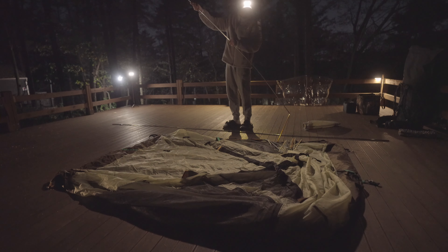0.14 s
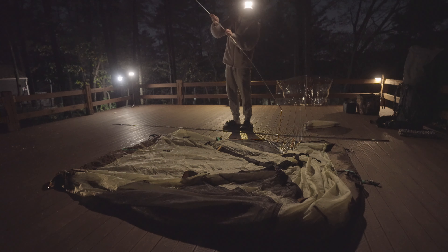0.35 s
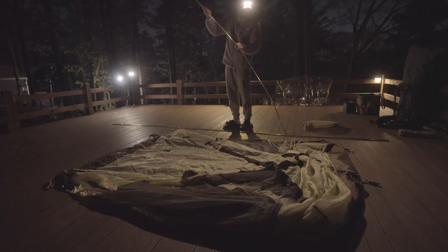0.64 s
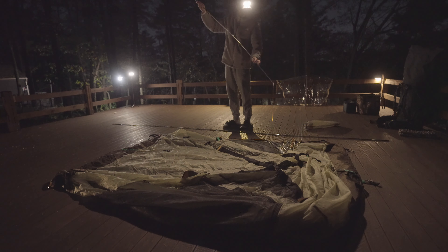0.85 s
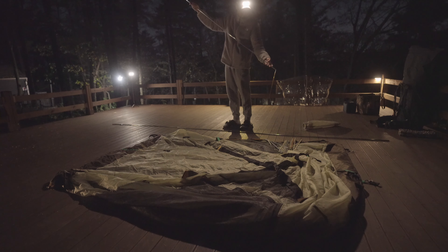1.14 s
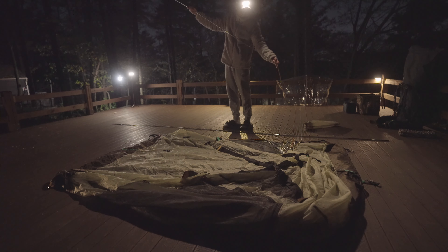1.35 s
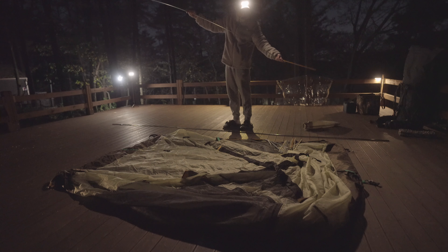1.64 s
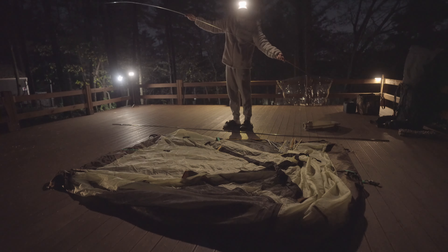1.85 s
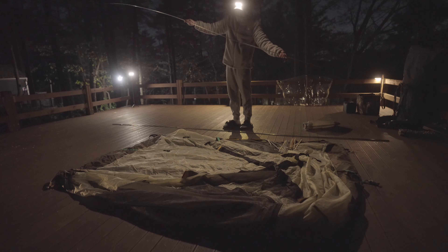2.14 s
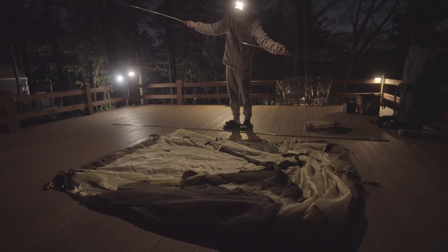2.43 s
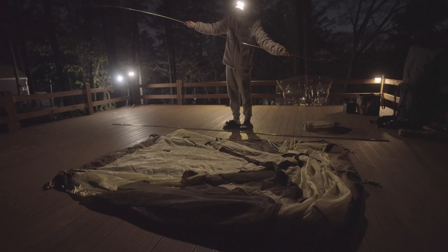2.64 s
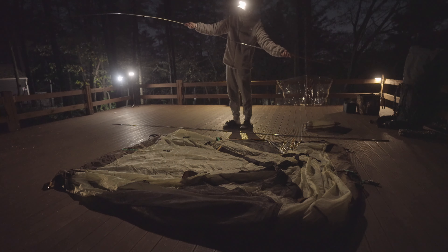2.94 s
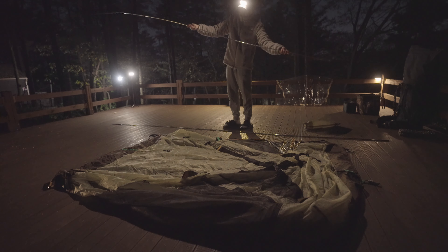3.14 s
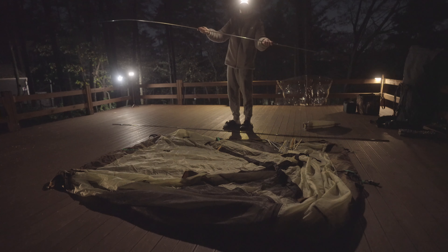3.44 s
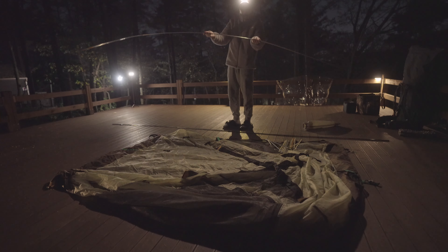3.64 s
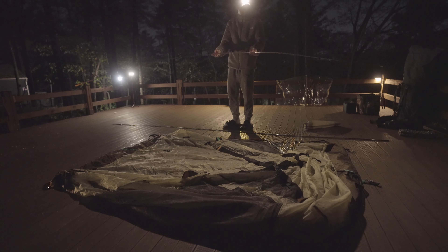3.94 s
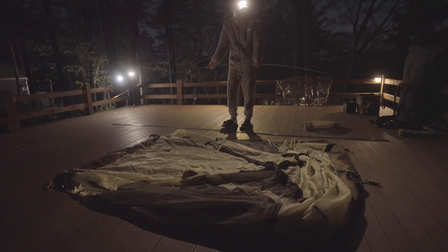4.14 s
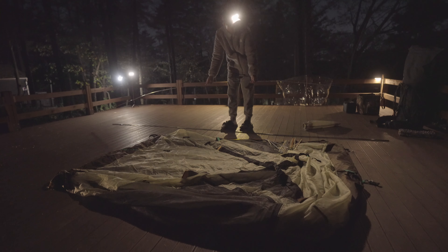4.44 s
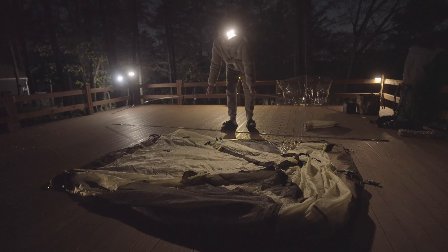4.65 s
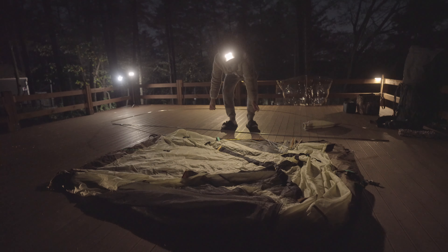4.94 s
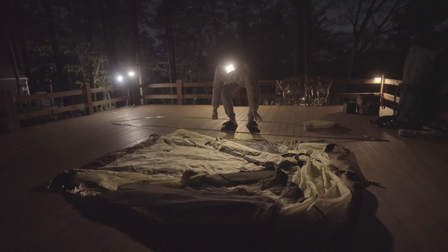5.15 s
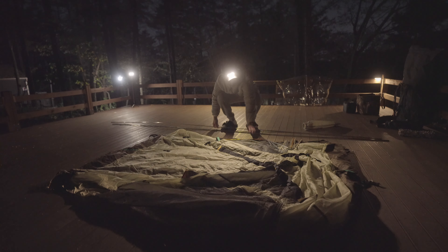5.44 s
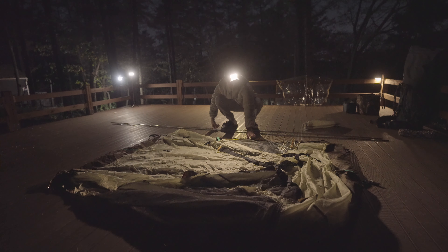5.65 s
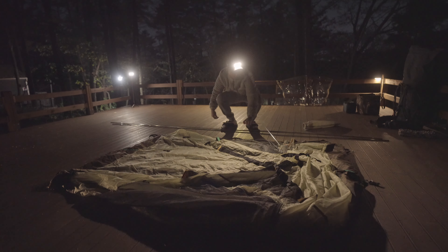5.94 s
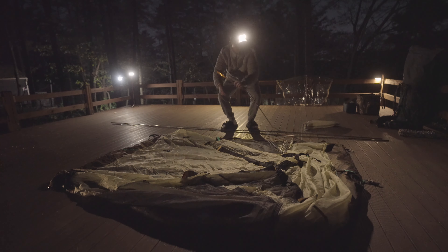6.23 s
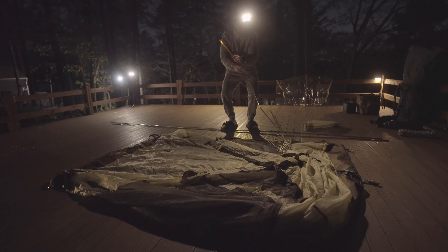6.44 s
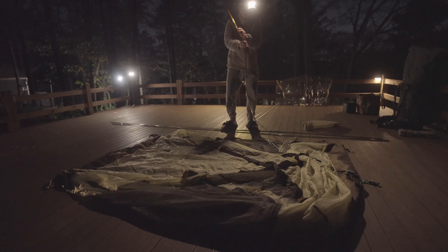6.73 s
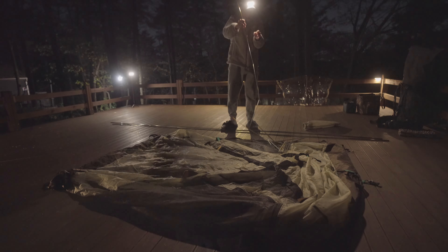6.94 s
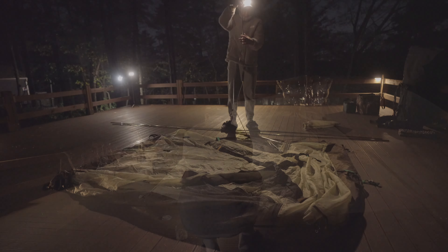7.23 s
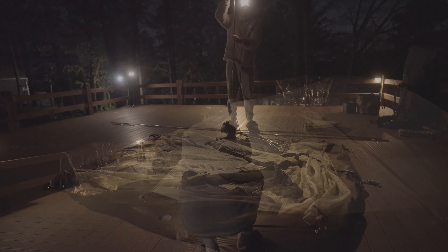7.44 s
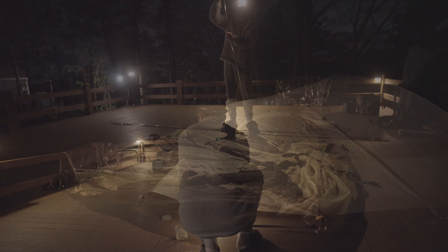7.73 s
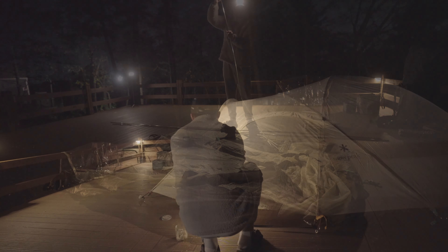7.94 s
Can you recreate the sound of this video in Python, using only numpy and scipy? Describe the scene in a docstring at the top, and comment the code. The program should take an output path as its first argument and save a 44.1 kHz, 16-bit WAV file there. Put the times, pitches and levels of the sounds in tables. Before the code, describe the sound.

Metal tent pole joints snap together and a pole clatters on a wooden deck, with nylon rustling in quiet outdoor air.

```python
"""A sharp metal snap comes first: elastic cord pulls the joint of a tent pole home, on a wooden deck at night.
More joints snap; a pole is laid down and clatters, each impact exciting the modes of tube and boards.
A tip drags by stick-slip friction, soft steps thump, nylon rustles and ticks, and a pole zips along it.
Trees scatter a faint echo, and behind the steady night air a far engine climbs in pitch."""
import sys
import numpy as np
from scipy import signal
from scipy.fft import rfft, irfft, next_fast_len
from scipy.io import wavfile
from scipy.ndimage import map_coordinates

SR = 44100
rng = np.random.default_rng(int(sys.argv[2]) if len(sys.argv) > 2 else 0)


def to_wav(s):
    """Save 16-bit WAV."""
    ch = np.atleast_2d(s).T  # columns
    pcm = np.round(np.clip(ch, -1, 1) * 32767)  # PCM
    wavfile.write(sys.argv[1], SR, pcm.astype(np.int16))


N = 355887
TIME = np.arange(N) / SR
HIT_TIME = np.arange(SR * 3 // 4) / SR  # seconds since one contact


# ferrule and tube spectra: (frequency [Hz], level [dB])
FERRULE_SPECTRUM = [(1500, -38), (4000, -14), (6000, -4), (8300, -0.5), (11000, -4.5), (13000, -4),
                    (16000, -3)]
TUBE_SPECTRUM = [(300, -31), (1000, -16), (2000, -4), (2800, 0), (4200, -0.5), (6000, -9), (10000, -34.5)]
# where the hands work: (time [s], leftward pan [dB])
HAND_PATH = [(0, -2.5), (2.4, -4.5), (5.8, -10), (7.0, -6.5), (7.15, -5)]
# joint snaps and small ticks of the rustling cloth (6.011 and 6.763 s): (time [s], level [dB],
# relative tube level [dB], clink frequency [Hz], ring frequency [Hz], relative rattle level [dB])
SNAPS_AND_TICKS = [(0.0309, -11, -12, 2740, 8500, -10), (0.049, -25, -14, 2720, 8750, 0),
                   (0.547, -43, -9, 2600, 8400, -10), (0.652, -52, -14, 3500, 7500, -8),
                   (1.3107, -42, -7.5, 3800, 8440, -0.5), (1.3961, -34, -10, 2800, 14800, -7.5),
                   (2.363, -19.5, -11.5, 3620, 6970, -18), (4.581, -57, 4.5, 2900, 5500, -10),
                   (5.8092, -43, -18, 4090, 8100, -18), (6.011, -37, -8.5, 2900, 7500, -11),
                   (6.111, -33.5, -19, 3060, 10540, -5.5), (6.373, -30.5, -15, 3740, 7200, -2.5),
                   (6.4429, -20.5, -15.5, 2960, 13900, -3.5), (6.5048, -25.5, -11, 4110, 10500, -2.5),
                   (6.7469, -15.5, -40, 4270, 12400, -5), (6.763, -23.5, -25, 4270, 8850, -6),
                   (6.9033, -15, -14.5, 3440, 15450, -0.5), (7.0406, -24, -15, 4000, 11900, -7),
                   (7.0728, -20, -11, 3400, 12750, -4), (7.153, -22, -10.5, 2920, 8400, -16),
                   (7.7347, -39, -20, 3870, 6630, -10), (7.8009, -23.5, -11.5, 3620, 7140, -17),
                   (7.896, -20, -17.5, 4200, 10300, -11.5)]
def snaps_and_ticks():
    """Impact excitation: the cord pulls a ferrule home, the tube rings and loose contacts buzz.
    Small ticks of the rustling cloth share the same short, bright sound."""
    track = np.zeros((2, N))
    strike = fade(t60=0.019, attack=0.0002)
    for time, db, tube_db, clink_hz, ring_hz, rattle_db in SNAPS_AND_TICKS:
        snap = mode_noise(FERRULE_SPECTRUM, ripple_db=3.5, groups=80)
        ferrule = snap + amp(-7) * mode_cluster(ring_hz, width_hz=310)
        clack = mode_noise(TUBE_SPECTRUM, ripple_db=3.5)
        tube = amp(tube_db - 2.5) * (clack + amp(-2) * mode_cluster(clink_hz, width_hz=260))
        rattle = amp(rattle_db) * chatter(rate=284, depth_db=1) * fade(t60=0.087, attack=0.0077)
        click = ferrule * (strike + rattle) + tube * (fade(t60=0.053, attack=0.00027) + rattle)
        pan_db = np.interp(time, *np.transpose(HAND_PATH))
        add(track, time, panned(amp(db + 2) * click, pan_db))
    return track


# struck metal and hollow deck spectra: (frequency [Hz], level [dB])
CRACK_SPECTRUM = [(800, -24), (1800, -1), (3200, 0), (5000, -4), (7000, -2), (10000, -10.5), (16000, -12)]
THUMP_SPECTRUM = [(40, -19), (100, -7), (150, -5), (230, -3), (350, -0.5), (520, -4.5), (900, -7.5),
                  (2500, -97)]
# pole hitting the deck: (time [s], level [dB], relative crack level [dB], leftward pan [dB],
# section frequency [Hz], rise time [s])
POLE_IMPACTS = [(4.857, -27.5, -1, 1, 1714, 0.0043), (5.058, -35.5, -2, 3, 850, 0.0018),
                (5.103, -21, -6, -6, 1124, 0.0014), (5.416, -21, -2.5, -3.5, 335, 0.0041),
                (5.421, -10.5, -13.5, -6, 1050, 0.0018), (5.500, -29.5, -4.5, -4, 1014, 0.0012),
                (5.506, -19.5, -8.5, -7.5, 673, 0.0008), (5.565, -12.5, -6, 0.5, 1094, 0.0019),
                (5.607, -20.5, -11, -11, 953, 0.0019), (5.621, -21, -11.5, 4, 463, 0.0026),
                (5.648, -18, -8, -0.5, 1459, 0.00086), (7.069, -13, -4, 0, 1414, 0.0095),
                (7.224, -25.5, 0.5, -5, 2105, 0.0065), (7.239, -16.5, -15, -4, 1330, 0.0012),
                (7.258, -23, -18, -1, 784, 0.0063), (7.295, -20, -10.5, -2.5, 785, 0.0036),
                (7.59, -43, -25, -3, 756, 0.0018), (8.049, -31.5, -4.5, -8, 1170, 0.0018)]
def pole_clatter():
    """Contact time shapes an impact: as sections land, slower blows favour bending and deck thump."""
    track = np.zeros((2, N))
    for time, db, crack_db, pan_db, hz, rise in POLE_IMPACTS:
        softness = np.log2(rise / 0.001)  # doublings of a 1 ms rise
        bounces = amp(-9) * chatter(rate=295, depth_db=4) * fade(t60=0.17, attack=0.006)
        crack = mode_noise(CRACK_SPECTRUM, ripple_db=2) * (fade(t60=0.039, attack=0.33 * rise) + bounces)
        section = amp(-7.5 + 2.5 * softness) * bending_modes(hz) * fade(t60=0.16, attack=rise)
        thump = mode_noise(THUMP_SPECTRUM, ripple_db=2, groups=400)
        thump *= fade(t60=0.49, attack=0.01)  # the joists take a moment to get going
        thump_db = -39 + 0.57 * (db + 21.5) + 1.5 * softness
        blow = boards(rise) + section + amp(crack_db + 4.5) * crack
        add(track, time, panned(amp(db) * blow + amp(thump_db) * thump, pan_db))
    return track


def bending_modes(hz):
    """Beating: three close bending modes, started by one blow, interfere."""
    detune, phase = rng.standard_normal((2, 3, 1))
    channel_phase = rng.standard_normal((2, 3, 1))
    angle = 2 * np.pi * hz * (1 + 0.0295 * detune) * HIT_TIME
    return np.sin(angle + 0.5 * phase + 0.5 * channel_phase).mean(1)


# struck plank spectrum: (frequency [Hz], level [dB])
WOOD_SPECTRUM = [(250, -49), (500, -9.5), (900, 2.5), (1400, -2), (2200, -7), (3500, -17), (8000, -40)]
def boards(rise):
    """Impulse response of planks: a dense knock, a longer tail and ringing modes."""
    knock = fade(t60=0.087, attack=0.82 * rise)
    tail = amp(-13.5) * fade(t60=0.5, attack=0.01)
    wood = mode_noise(WOOD_SPECTRUM, ripple_db=4.5, groups=200) * (knock + tail)
    ring = deck_ring() * (1 - np.exp(-HIT_TIME / rise))
    return amp(-3.5) * wood + amp(-7) * ring


# pole and boards ringing together: (frequency [Hz], relative level [dB], 60 dB decay time [s])
DECK_MODES = [(301.3, -4, 0.69), (402, -2, 0.43), (499.5, -5.5, 0.93), (618, 5, 0.13), (705, 7, 0.26),
              (794, -5, 0.53), (1125, -6, 0.38), (1170, -4, 0.17), (1302, 3, 0.1), (1746, 6, 0.053),
              (1997, 8, 0.033), (2410, -3.5, 0.03), (2660, -1, 0.066), (3020, -14, 0.069), (3910, 5, 0.11)]
def deck_ring():
    """Modal superposition: each blow weights the damped modes anew; the bouncing pole shifts them."""
    hz, db, t60 = np.transpose(DECK_MODES)[:, :, None]
    excitation, detune, phase, skew = rng.standard_normal((4, len(DECK_MODES), 1))
    drift = np.array([wobble(43, size=len(HIT_TIME)) for _ in DECK_MODES])
    angle = 2 * np.pi * (hz * (1 + 0.01346 * detune) * HIT_TIME + phase) + 0.98 * drift
    spread = skew * stereo_angle(HANDLING_CORRELATION, hz)
    strength = amp(db + 0.37 * excitation)
    decay = strength / np.linalg.norm(strength) * amp(-60 * HIT_TIME / t60)
    return np.array([(decay * np.sin(angle + offset)).sum(0) for offset in (spread, -spread)])


# pole resonances, one list for each of two grips: (frequency [Hz], bandwidth [Hz], level [dB])
GRIP_MODES = [
    [(315, 43, -5.5), (516, 12, -7.5), (758, 36, -3.5), (989, 17, 2.5), (1144, 24.1, -4), (1444, 50, -10.5),
     (2780, 78, -18)],
    [(478, 79, -8.5), (857, 53, -4), (1033, 62, 2), (1128, 77, -2), (1980, 350, -13.5)],
]
# scraped plank spectrum: (frequency [Hz], level [dB])
SCRAPE_SPECTRUM = [(70, -1.5), (160, -1), (350, 1), (750, 5), (1100, -6), (1350, -1), (2500, -8),
                   (6000, -44)]
# pushes of the tip: (time [s], duration [s], level [dB])
TIP_PUSHES = [(0.024, 0.1, -43.5), (0.152, 0.1, -42.5), (0.349, 0.063, -57), (0.535, 0.011, -48.5),
              (5.928, 0.18, -43), (6.053, 0.012, -40), (6.143, 0.096, -49), (6.223, 0.053, -41),
              (6.271, 0.076, -33.5), (6.625, 0.066, -35), (6.704, 0.035, -40.5), (6.765, 0.076, -45.5),
              (6.854, 0.032, -40.5)]
def tip_drag():
    """Stick-slip friction: the tip catches on the grain and shakes both pole and boards."""
    track = np.zeros((2, N))
    regrip_s = 5
    for second_grip, modes in zip((False, True), GRIP_MODES):
        def pole_response(f):
            return sum((-1) ** k * amp(db) * resonance(f, hz, width)
                       for k, (hz, width, db) in enumerate(modes))
        pole = coloured(filtered(slips(rate=900), pole_response), FLAT_SPECTRUM)
        planks = coloured(slips(rate=2100), SCRAPE_SPECTRUM)
        pushes = []
        for start, length, db in TIP_PUSHES:
            if (start > regrip_s) == second_grip:
                bite = 1 + amp(-4) * np.exp(-np.abs(TIME - start) / 0.0076)  # jolt of the first catch
                stroke = push(start, length, attack=0.0055, sag_db_per_s=40, release_db_per_s=234)
                pushes.append(amp(db) * bite * stroke)
        track += np.linalg.norm(pushes, axis=0) * (amp(0.5) * pole + amp(-5.5) * planks)
    return panned(track, pan_db=-6.5)


# sliding nylon spectrum: (frequency [Hz], level [dB])
NYLON_SPECTRUM = [(500, -26), (1500, 3), (2800, -1.5), (5000, -0.5), (8500, 0.5), (11000, -5),
                  (14000, -4.5), (16000, -7)]
# tugs of the cloth: (peak time [s], level [dB], rise time [s])
NYLON_TUGS = [(0.075, -44.5, 0.1158), (0.161, -52, 0.14), (5.852, -39, 0.06), (6.005, -44.5, 0.14),
              (6.283, -31, 0.03), (6.315, -41, 0.12), (6.662, -27.5, 0.0516), (6.805, -45, 0.16),
              (7.0, -44.5, 0.03), (7.095, -30.5, 0.07), (7.17, -34.5, 0.1), (7.265, -38.5, 0.08),
              (8.07, -47.5, 0.24)]
def nylon_rustle():
    """Friction noise: nylon hisses as it slides and crackles where creases give; tugs add in power."""
    cloth = rng.standard_normal((2, N)) + slips(rate=2200)
    catching = amp(2 * wobble(80))
    tugs = [amp(db) * swell(time, rise, fall_s=1.13 * rise) for time, db, rise in NYLON_TUGS]
    brushing = amp(-49.5) * push(start=6.13, length=1.25, attack=0.014, sag_db_per_s=2, release_db_per_s=74)
    sliding = np.linalg.norm(tugs + [brushing], axis=0)
    return panned(sliding * catching * coloured(cloth, NYLON_SPECTRUM), pan_db=-6)


# loose cloth spectrum: (frequency [Hz], level [dB])
CLOTH_SPECTRUM = [(80, -29), (280, 4.5), (450, -1), (1200, -2), (2200, -7), (5000, -20.5)]
def weave_zip():
    """Periodic excitation: threads pass under a pole, so pitch and level rise with its speed."""
    start_s, speed_up_s = 7.8, 0.125
    start_hz, top_hz, db_per_octave = 240, 617, 7.5
    hz = np.interp(TIME - start_s, [0, speed_up_s], [start_hz, top_hz])
    db = -42 + db_per_octave * np.log2(hz / top_hz)
    angle = 2 * np.pi * np.cumsum(hz * (1 + 0.0248 * wobble(130))) / SR
    whirr = unit(np.sin(angle) + amp(-10) * np.sin(2 * angle)) * amp(-0.5 + 1.9 * wobble(70))
    steadiness = (hz / top_hz) ** 2  # a slow push is too uneven to sing
    rush = amp(-1.5) * coloured(slips(rate=4000), CLOTH_SPECTRUM)
    return amp(db) * (TIME >= start_s) * (steadiness * whirr + rush)


# soft steps on the deck: (time [s], level [dB], rise time [s])
FOOTFALLS = [(4.205, -41.5, 0.00056), (7.485, -46, 0.013)]
def footsteps():
    """Soft impact: a sole excites mainly the low modes of the hollow deck."""
    track = np.zeros((2, N))
    for time, db, rise in FOOTFALLS:
        thump = mode_noise(THUMP_SPECTRUM, ripple_db=-1.5, groups=400)
        thump *= fade(t60=0.34, attack=0.0027 + rise)
        plank = bending_modes(hz=251.5) * fade(t60=0.13, attack=rise)
        step = boards(rise) + amp(6) * thump + amp(6.5) * plank
        add(track, time, panned(amp(db) * step, pan_db=-2.5))
    return track


# outdoor reverberation: (frequency [Hz], 60 dB decay time [s])
ECHO_DECAY = [(200, 0.8), (1000, 0.78), (4000, 0.6), (14000, 0.54)]
def tree_echo(sound):
    """Scattering: railing and trunks return a thin tail whose treble dies first."""
    delay_s, crossfeed = 0.014, 0.65
    hz, t, noise = signal.stft(rng.standard_normal((2, len(HIT_TIME))), SR, nperseg=256)
    decay = amp(-60 * t / along(ECHO_DECAY, hz)[:, None])
    tail = signal.istft(noise * decay, SR, nperseg=256)[1]
    tail = coloured(tail, spectrum=[(100, 8.5), (1500, -5.5), (10000, -7.5)])
    delayed = np.pad(sound + crossfeed * sound[::-1], ((0, 0), (round(delay_s * SR), 0)))
    return signal.fftconvolve(delayed, tail / np.linalg.norm(tail[0]), axes=1)[:, :N]


def far_engine():
    """Pitch follows rotation rate: an engine gathers speed as its drone swells and fades."""
    loudest_s, loudest_hz, climb_hz_per_s = 4.62, 178, 24
    hz = loudest_hz + climb_hz_per_s * (TIME - loudest_s)
    drone = unit(np.sin(2 * np.pi * np.cumsum(hz) / SR))
    return drone * amp(-54.5 + 0.99 * wobble(33)) * swell(loudest_s, rise_s=0.67, fall_s=1.26)


# outdoor background spectrum: (frequency [Hz], level [dB])
AIR_SPECTRUM = [(12, -30), (22, -12), (50, -2.5), (86, -4.5), (116, -8), (154, -3.5), (277, -8.5),
                (347, -9.5), (499, -10), (802, -13.5), (1260, -16.5), (4940, -25), (14300, -28.5),
                (16000, -29.5)]
# its stereo image: (frequency [Hz], left-right correlation [-1 to 1])
AIR_CORRELATION = [(60, 1), (240, 0.96), (950, 0.024), (3770, -0.2), (15000, 0.19)]
def night_air():
    """Stationary noise: outdoor air, coherent in the bass and diffuse in the treble."""
    return amp(-55.5) * coloured(rng.standard_normal((2, N)), AIR_SPECTRUM, AIR_CORRELATION)


# even spectrum: (frequency [Hz], level [dB])
FLAT_SPECTRUM = [(1, 0)]
# stereo image of the handling sounds: (frequency [Hz], left-right correlation [-1 to 1])
HANDLING_CORRELATION = [(150, 1), (350, 0.99), (600, 0.82), (1100, 0.5), (2200, -0.13), (8000, 0.093)]
def coloured(pair, spectrum, correlation=HANDLING_CORRELATION):
    """Mid-side mixing: two independent signals become spectrally shaped stereo of rms 1."""
    def response(hz):
        angle = stereo_angle(correlation, hz)
        return amp(along(spectrum, hz)) * [np.cos(angle), np.sin(angle)]
    mid, side = filtered(pair, response)
    return unit(np.array([mid + side, mid - side]))


def stereo_angle(correlation, hz):
    """Channel correlation is the cosine of twice this mid-side angle."""
    return np.arccos(np.clip(along(correlation, hz), -1, 1)) / 2


def panned(x, pan_db):
    """Acoustic shadow: the microphone's housing shades treble most; left leads by pan_db at 5 kHz."""
    def shade(hz):
        gains = amp(np.outer([1, -1], pan_db * (hz / 5000) ** 0.41) / 2)
        return gains / np.sqrt(np.mean(gains ** 2, axis=0))
    return filtered(x, shade)


def mode_noise(spectrum, ripple_db, groups=48):
    """Modal overlap: dense modes merge into noise; the contact point favours some groups of them."""
    weights = rng.standard_normal(groups)
    ripple = lambda hz: amp(ripple_db * np.interp(hz, np.linspace(0, SR / 2, groups), weights))
    return coloured(filtered(rng.standard_normal((2, len(HIT_TIME))), ripple), spectrum)


def mode_cluster(hz, width_hz):
    """Narrow-band noise: tube modes crowd round one frequency, rms 1."""
    noise = rng.standard_normal((2, len(HIT_TIME)))
    return coloured(filtered(noise, lambda f: resonance(f, hz, width_hz) ** 2), FLAT_SPECTRUM)


def resonance(hz, centre, width):
    """Frequency response of a damped oscillator."""
    return 1j * hz * width / (centre ** 2 - hz ** 2 + 1j * hz * width)


def slips(rate):
    """Shot noise: tiny slips of widely differing size, on average rate a second, rms 1."""
    size = amp(5 * np.clip(rng.standard_normal(N), -2, 2))
    return unit((rng.random(N) < rate / SR) * size * rng.standard_normal((2, N)))


def chatter(rate, depth_db):
    """Amplitude modulation: loose sections touch again and again, a flutter of rms 1."""
    return unit(amp(depth_db * np.tanh(wobble(rate, size=len(HIT_TIME)))))


def fade(t60, attack):
    """Exponential damping: a contact builds up, then loses 60 dB in t60 seconds."""
    return amp(-60 * HIT_TIME / t60) * (1 - np.exp(-HIT_TIME / attack))


def push(start, length, attack, sag_db_per_s, release_db_per_s):
    """Envelope of driven vibration: an attack, a sagging hold, a release."""
    t = np.maximum(TIME - start, 0)
    return (1 - np.exp(-t / attack)) * amp(-sag_db_per_s * t - release_db_per_s * np.maximum(t - length, 0))


def swell(peak_s, rise_s, fall_s, rounding_db=2.5):
    """Exponential growth and decay: about 20 dB up in rise_s, a rounded crest, down in fall_s."""
    below_db = 20 * np.maximum((peak_s - TIME) / rise_s, (TIME - peak_s) / fall_s)
    return amp(rounding_db - np.hypot(below_db, rounding_db))


def wobble(rate, size=N):
    """Spline interpolation through rate random values a second."""
    return map_coordinates(rng.standard_normal(int(size * rate / SR) + 4), [np.arange(size) * rate / SR])


def filtered(x, response):
    """Linear filtering: the spectrum of x times a frequency response."""
    size = x.shape[-1]
    padded = next_fast_len(size + 4096)
    return irfft(rfft(x, padded) * response(np.fft.rfftfreq(padded, 1 / SR)), padded)[..., :size]


def along(points, hz):
    """Interpolation of (frequency [Hz], value) points on a log axis."""
    frequencies, values = np.transpose(points)
    return np.interp(np.log(hz + 1), np.log(frequencies + 1), values)


def amp(db):
    """Decibels to amplitude ratio."""
    return 10 ** (np.asarray(db) / 20)


def unit(x):
    """Normalisation to rms 1."""
    return x / np.sqrt(np.mean(x ** 2) + 1e-20)


def add(track, time, sound):
    """Superposition of a sound on a track at a time in seconds."""
    start = max(round(time * SR), 0)
    part = sound[:, :N - start]
    track[:, start:start + part.shape[1]] += part


def scene():
    """Superposition of the direct handling sounds, their echo and the background."""
    handling = snaps_and_ticks() + pole_clatter() + footsteps() + tip_drag() + nylon_rustle() + weave_zip()
    return handling + amp(-18.5) * tree_echo(handling) + far_engine() + night_air()


def record(dry):
    """Band limiting: a steep low-pass removes the highest treble."""
    cutoff_hz = 15850
    return filtered(dry, lambda hz: 1 / (1 + (hz / cutoff_hz) ** 120))


dry = scene()
out = record(dry)
to_wav(out)
```